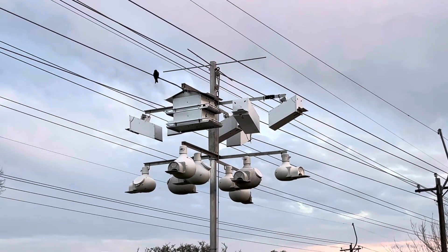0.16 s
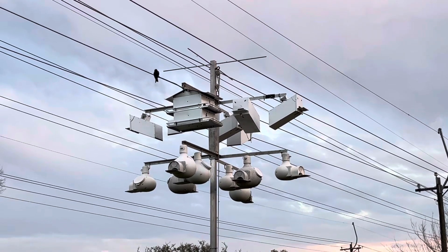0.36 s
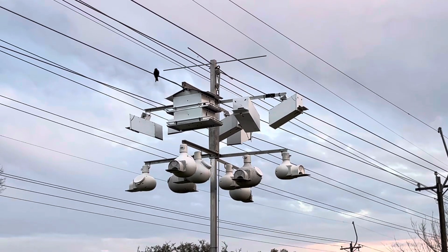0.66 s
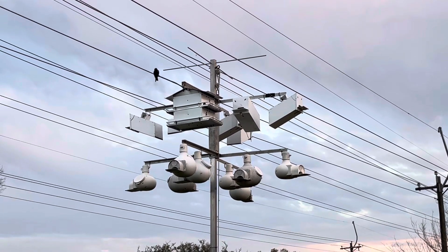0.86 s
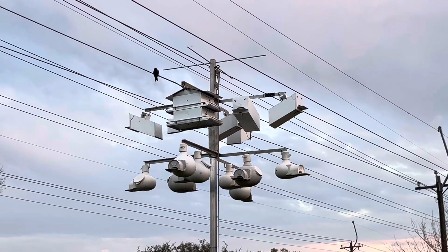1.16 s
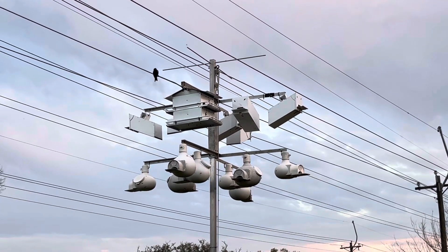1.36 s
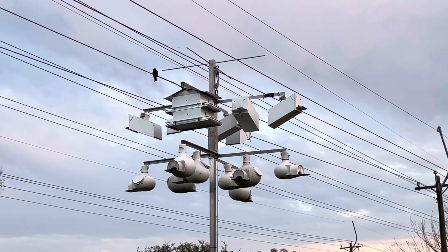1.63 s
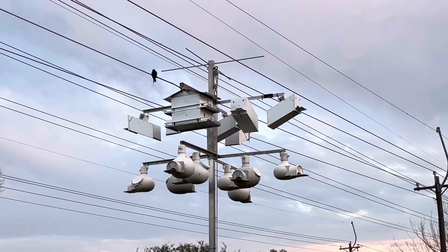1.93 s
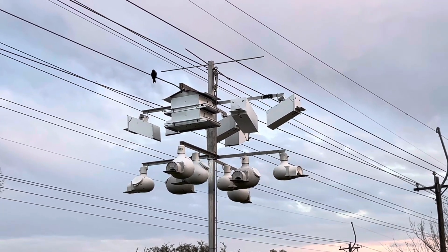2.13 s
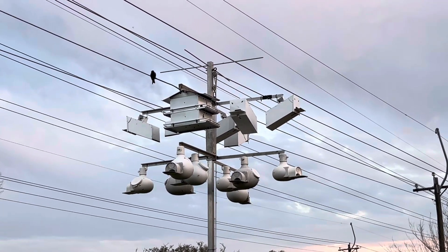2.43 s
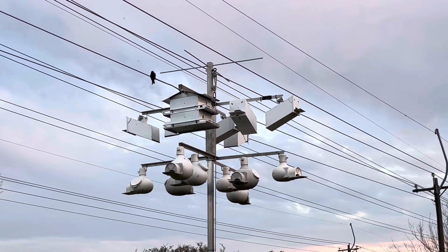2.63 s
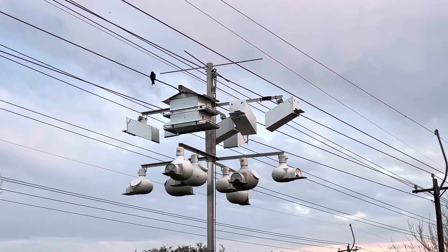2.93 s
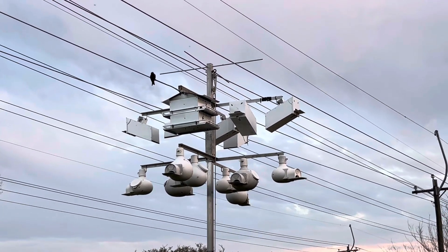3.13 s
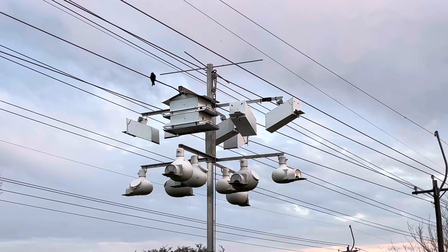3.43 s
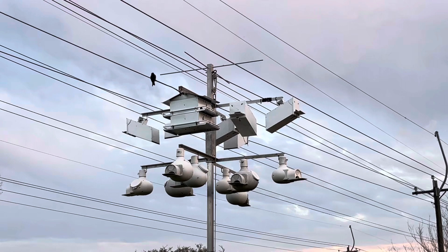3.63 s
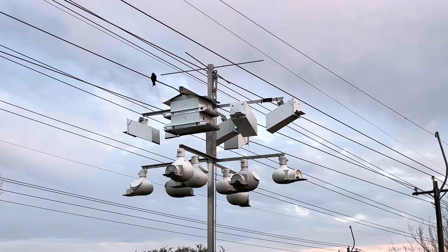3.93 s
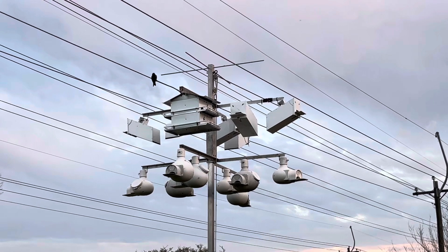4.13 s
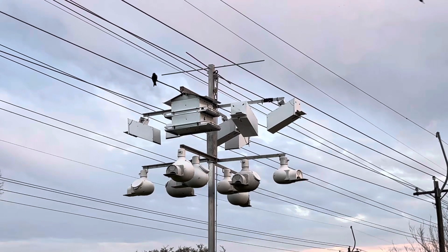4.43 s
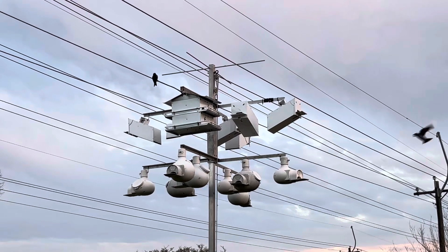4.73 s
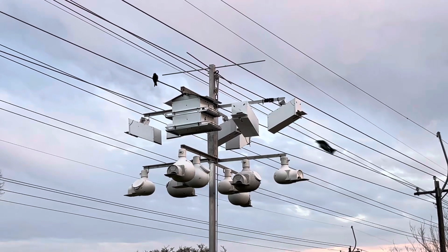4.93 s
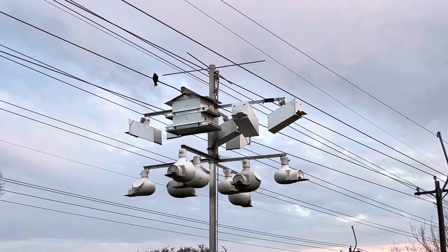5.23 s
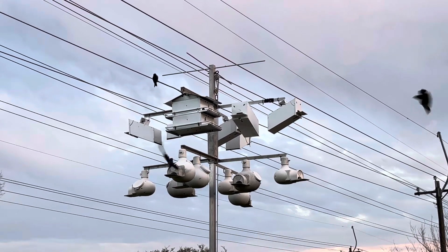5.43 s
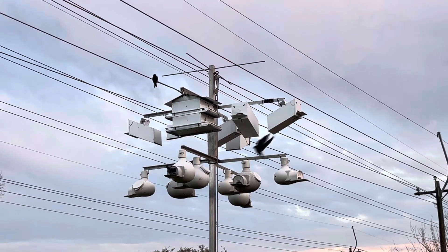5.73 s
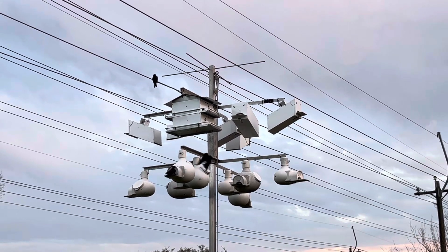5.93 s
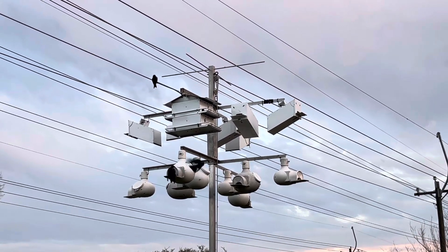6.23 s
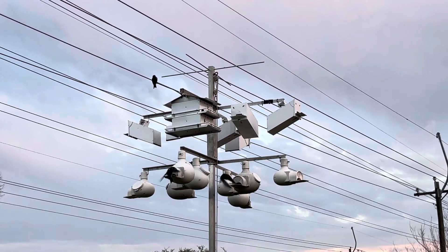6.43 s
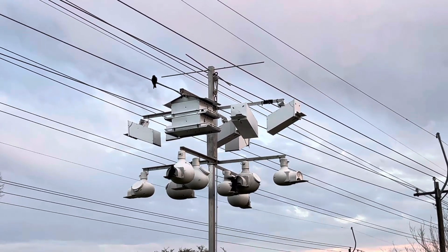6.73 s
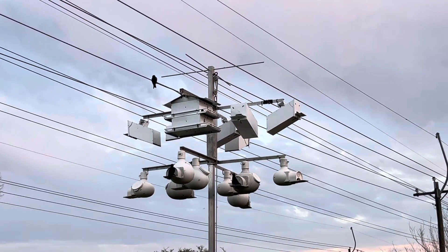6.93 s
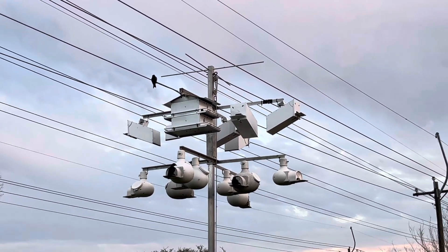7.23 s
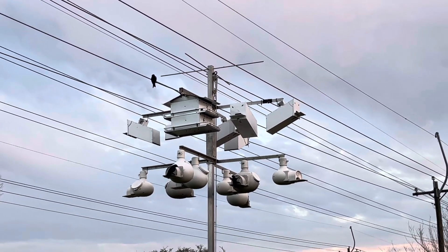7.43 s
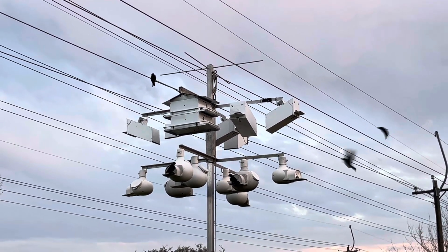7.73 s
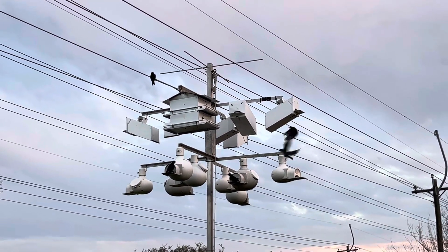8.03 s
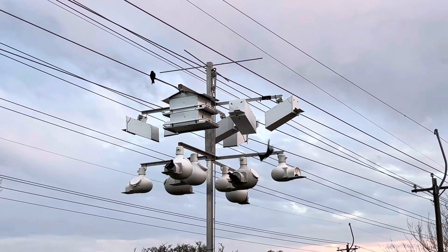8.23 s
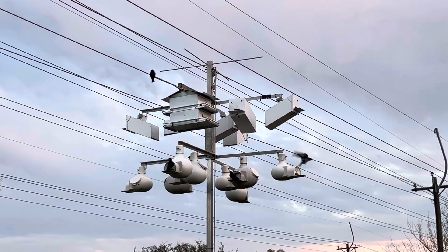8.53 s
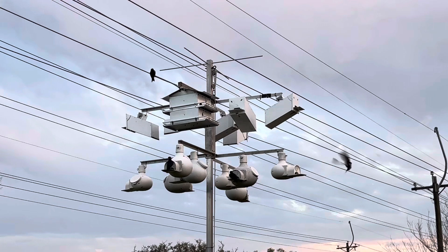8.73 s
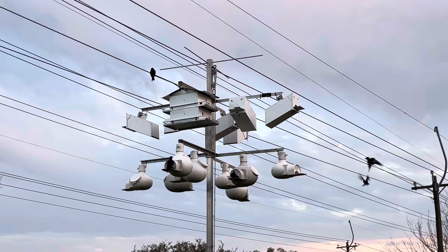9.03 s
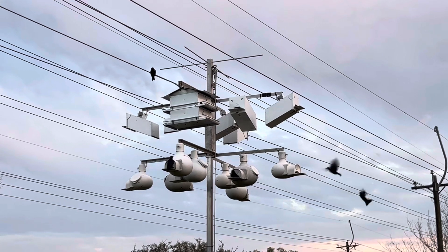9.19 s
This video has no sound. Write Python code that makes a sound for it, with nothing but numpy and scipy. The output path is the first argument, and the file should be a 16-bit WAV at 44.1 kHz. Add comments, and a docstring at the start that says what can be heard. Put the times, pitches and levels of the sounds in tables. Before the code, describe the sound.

A colony of martins calls around nest boxes outdoors. Faint, quick chirps and a few buzzy, sliding whistles come first, with short lulls between them. About halfway through, low gurgling chortles join and the calls grow into a louder, dense chorus, with more birds chattering farther off. Distant traffic rumbles steadily and a far engine hums underneath. The calls echo lightly off houses and trees, heard through a small stereo microphone.

```python
"""A colony of martins around nest boxes on a pole, heard by a small stereo microphone with two close ports.
From the start, birds give quick sweeping chirps while far traffic rumbles and a far engine drones.
At about 1.5 s the first slurs come in: sliding whistles with a fast shake, called a burr.
After a sparse stretch, low three-note chortles join near 4.8 s and the calls build to a dense chorus.
Each note is a nearly pure tone with a little breath hiss; houses and trees throw the calls back."""
import sys
import numpy as np
from scipy import signal
from scipy.fft import rfft, irfft, next_fast_len
from scipy.io import wavfile
from scipy.ndimage import uniform_filter1d

SR = 44100
rng = np.random.default_rng(int(sys.argv[2]) if len(sys.argv) > 2 else 0)


def generate_wav(sig):
    """Save sig (samples, or channels by samples) to the path in sys.argv[1] as 16-bit PCM at SR."""
    pcm = np.round(np.clip(np.atleast_2d(sig).T, -1, 1) * 32767).astype(np.int16)
    wavfile.write(sys.argv[1], SR, pcm)


N = 412776

# how throat and beak boost or weaken overtones: (frequency [Hz], gain [dB])
BEAK_COLOUR = [(3000, 13), (4500, -8.5), (6000, -9.5), (8000, -6), (11500, 4.5), (15500, -9)]
# single chirps: (time [s], length [ms], first pitch [Hz], last pitch [Hz], relative level [dB])
CHIRP_CALLS = [(.002, 11.6, 2690, 3020, -47.5), (.003, 39, 3960, 3780, -59.5),
               (.024, 22, 2925, 2835, -46.5), (.13, 27, 2660, 3030, -48.5), (.162, 29, 3130, 2410, -48),
               (.168, 53, 3906, 3870, -50.5), (.199, 39, 2410, 2160, -45), (.25, 29, 4300, 4120, -63),
               (.272, 30, 2680, 2960, -49), (.277, 53, 3810, 3800, -60), (.305, 18, 2800, 2950, -53),
               (.32, 19, 2620, 2720, -47.5), (.405, 34, 2380, 3150, -48), (.46, 30, 3540, 4060, -48),
               (.483, 30, 2426, 2170, -45.5), (.531, 37, 4320, 4630, -61), (.554, 31, 2670, 3030, -45.5),
               (.591, 34, 2930, 2780, -53), (.928, 19, 2604, 2706, -42.5), (1.01, 37, 2170, 2030, -51.5),
               (1.098, 26, 2504, 2160, -44), (1.242, 18, 2250, 2110, -49.5), (1.299, 10, 2350, 2130, -48.5),
               (1.363, 24, 3620, 3200, -40.5), (1.398, 14, 5030, 3770, -53), (1.402, 17, 2390, 1900, -51),
               (1.414, 36, 3120, 1385, -47.5), (1.424, 31, 3170, 2980, -43.5), (1.433, 43, 4660, 3100, -53),
               (1.447, 45, 2444, 1470, -49.5), (1.481, 20, 2650, 2580, -46), (1.579, 40, 3960, 3350, -45.5),
               (1.852, 32, 3760, 2084, -36.5), (1.869, 24, 5200, 3620, -51), (1.902, 17, 2950, 1860, -43),
               (2.896, 22, 5550, 3700, -55.5), (2.913, 40, 3410, 1690, -41.5), (2.94, 35, 2500, 1830, -46),
               (4.597, 19, 3290, 1270, -49.5), (4.624, 16.4, 2490, 1550, -43.5),
               (4.64, 33, 3830, 2123, -34), (4.658, 30, 5550, 2860, -51), (4.697, 15, 2830, 2030, -42.5),
               (4.717, 18, 3170, 2890, -44), (4.964, 21, 2215, 1575, -38), (4.981, 30, 3280, 1640, -31),
               (5.013, 27, 3460, 1860, -30.5), (5.068, 36, 2367, 1426, -38.5),
               (5.101, 18, 2630, 1580, -37.5), (5.185, 13, 3400, 3660, -40), (5.192, 28, 3817, 2226, -31),
               (5.206, 24, 5850, 3850, -55), (5.233, 27, 3820, 2680, -38.5), (5.276, 24, 3160, 2780, -33),
               (5.309, 24, 3400, 1910, -28.5), (5.316, 24, 3380, 2720, -31.5),
               (5.325, 36, 5480, 2790, -46.5), (5.326, 29, 2427, 2070, -33), (5.358, 18, 4460, 3000, -39.5),
               (5.376, 17.5, 2460, 1520, -35), (5.399, 20.5, 2624, 1510, -35), (5.543, 36, 2140, 1677, -48),
               (5.548, 39, 4240, 3000, -44.5), (5.59, 14, 4200, 3520, -43), (5.581, 22, 1890, 2100, -44),
               (5.608, 15, 3050, 2720, -39), (5.671, 43, 3060, 2724, -32), (5.646, 31, 2620, 1990, -45),
               (5.68, 20, 3536, 2390, -28.5), (5.703, 15, 2440, 1330, -36), (5.722, 22, 2626, 1525, -34.5),
               (5.836, 25, 3500, 2040, -30), (5.843, 16.6, 5630, 4670, -54), (5.995, 15, 4750, 3530, -41),
               (6.022, 13.5, 2600, 1880, -36), (6.034, 24, 3775, 2750, -37), (6.295, 31, 3150, 2870, -38),
               (6.346, 26, 2930, 2880, -44), (6.445, 26, 2550, 3100, -44.5), (6.485, 35, 3650, 3890, -50.5),
               (6.514, 53, 2540, 1930, -48), (6.581, 21, 2240, 1980, -44.5), (6.679, 14, 2790, 2480, -44.5),
               (6.717, 29, 2570, 3120, -48), (6.754, 69, 3620, 3976, -51.5), (6.854, 42, 2625, 3010, -45),
               (6.929, 14, 3390, 2580, -43.5), (6.935, 21, 4500, 3420, -52), (6.956, 39, 2700, 3030, -44.5),
               (7.048, 25, 3630, 3900, -45.5), (7.766, 20, 3160, 2490, -36), (7.809, 45, 2290, 1876, -42.5),
               (8.192, 25, 2750, 2470, -38.5), (8.229, 20, 2420, 1786, -33.5), (8.242, 46, 1977, 1926, -40),
               (8.283, 20.5, 2473, 1680, -34), (8.303, 25, 3220, 1565, -37.5), (8.44, 34, 2400, 2400, -46),
               (8.574, 18, 2740, 1910, -39.5), (8.703, 19, 3260, 2920, -38.5),
               (8.793, 19, 1935, 1090, -45.5), (8.852, 42, 4180, 3480, -57), (8.99, 12.5, 2740, 2020, -38),
               (8.998, 22, 3610, 1380, -43), (9.003, 27, 3860, 2270, -26.5), (9.018, 20, 5480, 4600, -50),
               (9.013, 17, 3660, 2630, -33), (9.017, 25, 2200, 2120, -38)]
# a chirp's overtones before colouring: (multiple of the pitch, level [dB])
CHIRP_HARMONICS = [(2, -18), (3, -30), (4, -55), (5, -61), (7, -62)]
# how the far birds' chatter rises and falls: (time [s], relative level [dB])
CHATTER_LEVELS = [(0, -51), (.5, -49.5), (1.3, -73), (1.62, -45), (2.03, -52.5), (2.5, -123), (2.9, -44.5),
                  (3.6, -82), (4.2, -60), (4.56, -57), (4.7, -44.5), (5.3, -46.5), (5.62, -42.5),
                  (5.9, -35.5), (6.65, -50.5), (7.35, -49), (7.85, -37.5), (8.8, -45), (9.15, -35.5),
                  (9.36, -42)]
# tone colour of the breath hiss: (frequency [Hz], gain [dB])
BREATH_COLOUR = [(1200, -41), (2500, -7), (5000, -26.5), (8000, -32), (11500, -34), (15500, -35.5)]
# how the echo from houses and trees dies away: (delay [s], relative level [dB])
ECHO_FADE = [(.004, 11), (0.029, 5.5), (0.058, 7.5), (.08, -2), (.097, 3), (.115, -9), (.15, -9), (.2, -9),
             (.26, -19.5), (.3, -16), (.5, -34)]
# tone colour of that echo: (frequency [Hz], gain [dB])
ECHO_COLOUR = [(1500, -1), (4000, 3.5), (8000, 2), (16000, -3)]
# tone colour of far traffic and air: (frequency [Hz], relative level [dB])
TRAFFIC_COLOUR = [(15, -52), (30, -4.5), (48, -1), (62, -9.5), (80, 3.5), (100, -8), (120, -9.5),
                  (160, -12.5), (220, -20.5), (400, -22.5), (900, -23.5), (1600, -22.5), (2300, -35.5),
                  (4500, -43.5), (9000, -58), (11500, -71), (13000, -85)]
# how alike the traffic is on the left and right: (frequency [Hz], likeness [0 to 1])
TRAFFIC_LIKENESS = [(60, 1), (160, 0.92), (300, 0.7), (600, 0.1), (1000, 0.6), (1500, 0.77), (2200, 1),
                    (15000, 0.68)]
# the far engine's hum: (time [s], pitch [Hz], level [dB])
ENGINE_PATH = [(0, 88, -58.5), (2.3, 84, -52.5), (2.9, 88, -52), (4.4, 94, -51), (5.4, 97, -46),
               (5.9, 96, -64), (6.3, 96, -47.5), (7.2, 96.5, -50.5), (7.6, 97, -48), (9.36, 97.5, -46)]
# burry slurs: (time [s], length [s], first pitch [Hz], turning pitch [Hz], last pitch [Hz],
# relative level [dB], swell along the call [dB], burr rate [Hz], burr swing [share of the pitch],
# brightness [dB])
SLUR_CALLS = [(1.464, 0.17, 3406, 3377, 2130, -47.5, -5, 118.8, 0.075, -4.5),
              (1.652, 0.18, 4026, 4000, 2440, -43.5, 2, 126.5, .057, 4),
              (2.638, 0.12, 3494, 3816, 3306, -42.5, 17, 134, 0.063, 0.5),
              (2.89, 0.15, 2256, 2948, 3450, -46, 6, 130.3, 0.036, -2),
              (2.917, 0.14, 3895, 4010, 2290, -42.5, 7, 129, 0.055, 0),
              (3.731, 0.13, 3560, 3425, 2245, -43, -6.5, 129.5, 0.05, -5.5),
              (3.97, .135, 3930, 4194, 3264, -45.5, 7, 134.2, 0.045, -2),
              (4.147, .205, 3767, 4050, 2310, -42.5, 4.5, 117.9, 0.038, -1),
              (4.824, 0.14, 3400, 3360, 2304, -36, 0.5, 121.3, 0.069, -8),
              (5.627, 0.057, 4160, 4030, 3895, -34.5, 14, 164.4, .065, 4.5),
              (5.778, 0.17, 2786, 3700, 2640, -36.5, 9, 161, 0.022, -0.5),
              (5.899, 0.14, 4025, 4066, 3310, -37.5, 4, 142.8, 0.048, -1.5),
              (6.115, .195, 3060, 3454, 2580, -46, 5, 143.7, 0.062, 2),
              (6.465, .21, 2600, 3436, 2623, -47.5, 9, 142.2, 0.068, 0.5),
              (7.079, 0.076, 3340, 3900, 3570, -35, 8, 162.3, 0.07, -6.5),
              (7.095, .095, 2830, 3120, 2765, -37, 9, 153.7, 0.079, 0.5),
              (7.27, 0.15, 2910, 3446, 1952, -38, -12, 127.3, 0.045, -6.5),
              (7.33, 0.085, 3256, 3130, 2905, -35.5, 11, 139.7, 0.077, -7.5),
              (7.833, 0.13, 3786, 3965, 2965, -32, -9, 140.4, 0.045, -10),
              (8.294, 0.17, 4400, 3960, 2354, -32.5, -0.5, 121.8, 0.065, -7.5),
              (8.585, 0.11, 2990, 3205, 2292, -39, -1, 95.9, 0.13, -2),
              (9.03, 0.13, 3290, 3080, 2580, -41.5, -15, 167.8, 0.2, -8),
              (9.207, 0.1, 2890, 3063, 2686, -37, -2, 75.6, .15, -18)]
# a slur's overtones before colouring: (multiple of the pitch, level [dB])
SLUR_HARMONICS = [(2, -21), (3, -31), (4, -42)]
# chortles: (time of the middle note [s], wait for the last note [ms], relative level [dB])
CHORTLE_CALLS = [(4.816, 27, -39.5), (5.28, 16.7, -30), (5.904, 29, -33), (6.107, 25, -32.5),
                 (7.53, 18, -37.5), (7.739, 30, -34), (7.935, 23, -31.5), (8.143, 27, -29),
                 (8.839, 31, -31.5)]
# the three notes of a chortle: (length [ms], first pitch [Hz], last pitch [Hz], gain [dB])
CHORTLE_SHAPE = [(19.1, 2350, 1480, -4.5), (21.73, 2700, 1620, -.2), (19.1, 2620, 1800, -1)]
# tone colour of the microphone: (frequency [Hz], gain [dB])
MIC_COLOUR = [(20, -16), (32, -30), (45, -1.5), (4300, -1), (11800, -1.5), (13000, 2), (14200, 1),
              (15500, 5)]
# how far the wave at the left port runs ahead of the right: (frequency [Hz], phase lead [radians])
LEFT_LEAD = [(0, 0), (860, 1.4), (1460, 4.8), (2070, 6.2), (3360, 6.6), (5170, 6.3), (5770, 4.7),
             (6850, 3.14), (7670, .8), (10100, -.6), (11800, -2.4), (12700, -3.14), (13700, -3.8),
             (14700, -5.5), (15800, -6.3)]
# how much louder the left port is: (frequency [Hz], left minus right [dB])
LEFT_BALANCE = [(60, 0), (110, -0.5), (200, 1.5), (380, 1.5), (700, 4), (1290, -0.5), (2380, -1.5),
                (4400, 0.5), (8120, 1.5), (15000, -1.5)]

CHIRP_BEND = 0.24  # how much faster a chirp sweeps at first than at its end
WALL_DELAY_S, WALL_DB = 0.11, -20.5  # one house front returns a distinct echo
TRAFFIC_DB, MIC_CUTOFF_HZ = -45, 15750
SLUR_FADE_IN_S, SLUR_FADE_OUT_S = 0.024, 0.05
TURN_S, CLIMB_HZ_PER_S = 0.026, 40000  # a slur turns down after this wait plus the time it climbs
FALL_BEND, FALL_ROUNDNESS = 1.05, 1.5  # raising either makes the fall start more gently
FALL_END = 0.98  # share of a slur's length at which the fall levels out


def gain_of(db):
    """Turns decibels into a number to multiply by."""
    return 10 ** (np.asarray(db) / 20)


def unit_level(x):
    """Scales a signal so that its average strength (rms) is 1."""
    return x / np.sqrt(np.mean(x ** 2) + 1e-20)


def look_up(table, hz):
    """Reads between the rows of a table on a log-frequency axis."""
    row_hz, value = np.transpose(table)
    return np.interp(np.log(hz + 1), np.log(row_hz + 1), value)


def add(mix, start_s, sound):
    """Mixes a sound in at the given time."""
    part = mix[max(round(start_s * SR), 0):][:len(sound)]
    part += sound[:len(part)]


def wobble(shape, samples):
    """Smoothed random wandering; smoothing over more samples makes it slower."""
    return unit_level(uniform_filter1d(uniform_filter1d(rng.standard_normal(shape), samples), samples))


def bird_voice(hz, overtones, bright_db):
    """The bird's voice organ makes a nearly pure tone; throat and beak colour its weak overtones."""
    phase = 2 * np.pi * (np.cumsum(hz) / SR + rng.random())
    upper = sum(gain_of(db + bright_db + look_up(BEAK_COLOUR, k * hz)) * np.sin(k * phase)
                * (k * hz < SR / 2) for k, db in overtones)
    return np.sqrt(2) * (np.sin(phase) + upper)


def chirp(ms, first_hz, last_hz, db, bright_db=0):
    """One quick, trembling sweep of the voice, up or down, with a soft start and end."""
    progress = np.linspace(0, 1, round(ms * SR / 1000))
    pitch_tremble, level_tremble = wobble((2, len(progress)), 60)
    sweep = progress + CHIRP_BEND * progress * (1 - progress)
    hz = (first_hz + (last_hz - first_hz) * sweep) * (1 + 0.005 * pitch_tremble)
    fade = abs(np.sin(np.pi * progress ** 0.74) ** 0.67)  # rises quicker than it dies away
    return gain_of(db + 0.68 * level_tremble) * fade * bird_voice(hz, CHIRP_HARMONICS, bright_db)


def far_chatter(count=340):
    """Birds farther off give many falling chirps at random moments and pitches."""
    birds = np.zeros(N)
    for when, pitch, fall, length, faintness in rng.random((count, 5)):
        centre_hz, drop_hz = 1700 + 1900 * pitch ** 1.7, 300 + 900 * fall
        note = chirp(14 + 18 * length, centre_hz + drop_hz / 2, centre_hz - drop_hz / 2, -9 * faintness)
        add(birds, when * N / SR, note)
    times, db = np.transpose(CHATTER_LEVELS)
    return unit_level(birds) * gain_of(np.interp(np.arange(N) / SR, times, db))


def breath_hiss(voices):
    """Air hisses through the throat, following the strength of the notes."""
    strength = np.sqrt(abs(uniform_filter1d(voices ** 2, 60)))
    size = next_fast_len(N)
    colour = gain_of(look_up(BREATH_COLOUR, np.fft.rfftfreq(size, 1 / SR)))
    return irfft(rfft(strength * rng.standard_normal(N), size) * colour, size)[:N]


def near_bounces(note, strength):
    """Ground, pole and nest boxes add a few quick copies of a note, different for every perch."""
    copies = np.zeros(1200)
    copies[0] = 1  # the note itself
    copies[rng.integers(60, 1200, 8)] = strength * rng.standard_normal(8)
    return signal.oaconvolve(note, copies / np.linalg.norm(copies))


def scattered_echo(calls):
    """Houses and trees send back many small, fading copies, mostly the same on the left and right."""
    delays, db = np.transpose(ECHO_FADE)
    size = SR // 2
    copies = np.zeros((3, size))  # rows: shared, left only, right only
    slots = np.arange(160, size - 20, 20)
    arrivals = slots + rng.integers(0, 20, (3, len(slots)))
    np.put_along_axis(copies, arrivals, rng.choice([-1., 1.], arrivals.shape), 1)
    fade = gain_of(np.interp(np.arange(size) / SR, delays, db))
    colour = gain_of(look_up(ECHO_COLOUR, np.fft.rfftfreq(size, 1 / SR)))
    echo = irfft(rfft((copies[0] + 0.29 * copies[1:]) * fade) * colour, size)
    return signal.fftconvolve(calls[None], echo / np.linalg.norm(echo[0]), axes=1)[:, :N]


def traffic():
    """Far traffic and air make a low, noisy rumble with faint drifting patches."""
    frames, hz = N // 512 + 5, np.fft.rfftfreq(2048, 1 / SR)
    left_re, left_im, other_re, other_im, patches = rng.standard_normal((frames, 1025, 5)).T
    patches = unit_level(uniform_filter1d(uniform_filter1d(patches, 12, 0), 20, 1))
    likeness = look_up(TRAFFIC_LIKENESS, hz)[:, None]
    left = left_re + 1j * left_im
    right = likeness * left + np.sqrt(1 - likeness ** 2) * (other_re + 1j * other_im)
    colour = gain_of(look_up(TRAFFIC_COLOUR, hz)[:, None] + 0.33 * patches)
    _, rumble = signal.istft(np.array([left, right]) * colour, nperseg=2048, noverlap=1536)
    return gain_of(TRAFFIC_DB) * unit_level(rumble[:, :N])


def engine_drone():
    """A far engine hums: a low, wavering tone with a weak overtone an octave up."""
    times, *columns = np.transpose(ENGINE_PATH)
    hz, db = (np.interp(np.arange(N) / SR, times, column) for column in columns)
    waver, swell = wobble(N, 5000), wobble(N, 5000)
    phase = 2 * np.pi * np.cumsum(hz + 1.4 * waver) / SR
    return np.sqrt(2) * gain_of(db + 0.38 * swell) * (np.sin(phase) + gain_of(-24) * np.sin(2 * phase))


def slur(length_s, first_hz, turn_hz, last_hz, level_db, swell_db, burr_hz, swing, bright_db):
    """A sliding, usually falling whistle whose pitch and strength shake very fast: the burr."""
    progress = np.linspace(0, 1, round(length_s * SR))
    t = progress * length_s
    turn_s = TURN_S + max(turn_hz - first_hz, 0) / CLIMB_HZ_PER_S
    opening = np.maximum(1 - t / turn_s, 0) ** 2
    after_turn = np.clip((t - turn_s) / (FALL_END * length_s - turn_s), 0, 1)
    fall = np.sin(np.pi / 2 * after_turn ** FALL_BEND) ** FALL_ROUNDNESS
    hz = turn_hz + (first_hz - turn_hz) * opening + (last_hz - turn_hz) * fall

    drift = unit_level(uniform_filter1d(rng.standard_normal(len(t)), 500))
    pace_hz = burr_hz * (hz / hz.mean()) ** 0.37 * (1 + 0.079 * drift)  # slows as the pitch sinks
    burr = 2 * np.pi * (np.cumsum(pace_hz) / SR + rng.random())
    shake = np.sin(burr + 2.14 * swing * np.sin(burr))  # slow fall, quick return
    pulse = 1 + np.tanh(4.8 * swing) * np.cos(burr - 3.6)  # loudest late in each fall
    pitch_tremble, level_tremble = wobble((2, len(t)), 50)  # no two shakes alike
    hz = hz * (1 + 0.013 * pitch_tremble) * (1 + swing * shake)

    db = level_db + swell_db * (progress - 0.5) + 1.5 * level_tremble
    ramp = np.minimum(t / SLUR_FADE_IN_S, (length_s - t) / SLUR_FADE_OUT_S)
    fade = np.sin(np.pi / 2 * np.minimum(ramp, 1))
    closing_db = bright_db + 10 - 13 * progress  # the beak closes: overtones fade along the call
    return gain_of(db) * unit_level(pulse) * fade * bird_voice(hz, SLUR_HARMONICS, closing_db)


def chortle(middle_s, wait_ms, db, lead_ms=24):
    """Lists three low falling chirps: a soft lead-in, the main drop and a shorter close."""
    starts = middle_s - lead_ms / 1000, middle_s, middle_s + wait_ms / 1000
    return [(start_s, ms, first_hz, last_hz, db + note_db)
            for start_s, (ms, first_hz, last_hz, note_db) in zip(starts, CHORTLE_SHAPE)]


def scene():
    """Near birds heard directly and echoed, far birds mostly echoed, over traffic and an engine."""
    slurs, chirps, chirps_to_echo = np.zeros((3, N))
    far = far_chatter()
    for start_s, *call in SLUR_CALLS:
        add(slurs, start_s, near_bounces(slur(*call), strength=0.18))
    chortle_notes = [note for call in CHORTLE_CALLS for note in chortle(*call)]
    for start_s, ms, first_hz, last_hz, db in CHIRP_CALLS + chortle_notes:
        # fainter birds are farther off: duller, and with a larger share of echo
        note = chirp(ms, first_hz, last_hz, db, bright_db=0.093 * (db + 18))
        add(chirps, start_s, near_bounces(note, strength=0.2))
        add(chirps_to_echo, start_s, gain_of(-0.3 * (db + 46.5)) * note)
    direct = gain_of(3.5) * slurs + gain_of(-1.47) * chirps + gain_of(-19) * far
    hiss = breath_hiss(gain_of(-8) * slurs + chirps + gain_of(-2) * far)
    echo = scattered_echo(gain_of(-6.5) * slurs + gain_of(-6) * chirps_to_echo
                          + gain_of(-7.5) * far + gain_of(-2) * hiss)
    wall_echo = np.zeros(N)
    add(wall_echo, WALL_DELAY_S, gain_of(WALL_DB) * near_bounces(direct, strength=0.48))
    return direct + wall_echo + hiss + echo + traffic() + engine_drone()


def record(dry):
    """The microphone colours the sound, gives each port its own timing and level, and cuts top treble."""
    size = next_fast_len(N + 8192)
    hz = np.fft.rfftfreq(size, 1 / SR)
    side = np.array([[0.5], [-0.5]])  # left, right
    lead_hz, lead = np.transpose(LEFT_LEAD)
    timing = np.exp(1j * side * np.interp(hz, lead_hz, lead))
    colour = gain_of(look_up(MIC_COLOUR, hz) + side * look_up(LEFT_BALANCE, hz))
    heard = irfft(rfft(dry, size) * timing * colour, size)[:, :N]
    treble_cut = signal.firwin(511, MIC_CUTOFF_HZ, window=("kaiser", 9), fs=SR)
    return signal.oaconvolve(heard, treble_cut[None], "same")


dry = scene()
out = record(dry)
generate_wav(out)
```